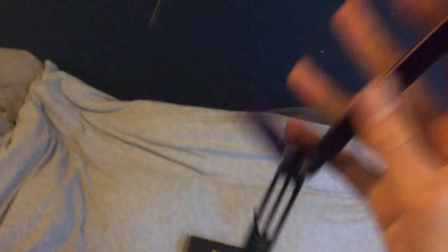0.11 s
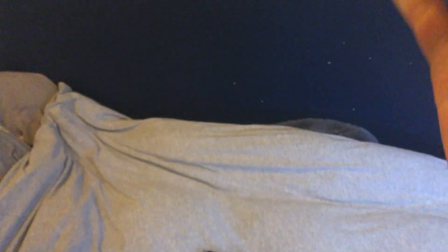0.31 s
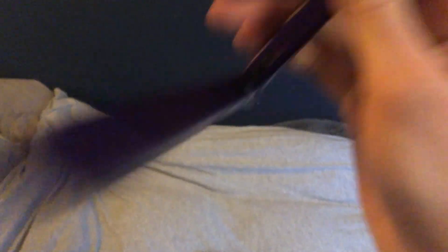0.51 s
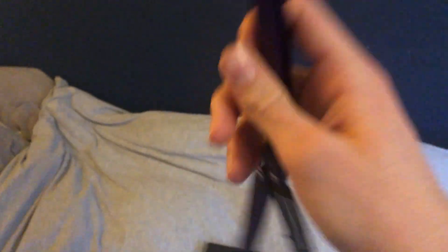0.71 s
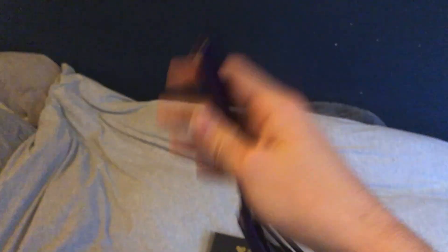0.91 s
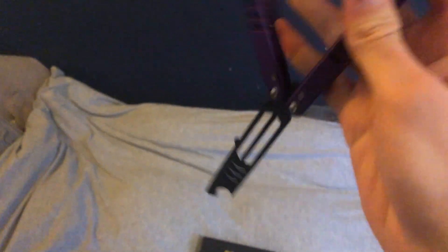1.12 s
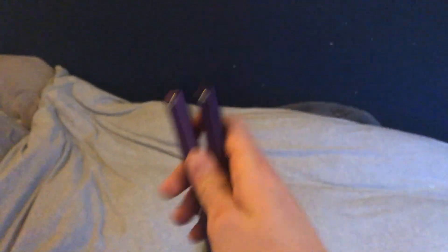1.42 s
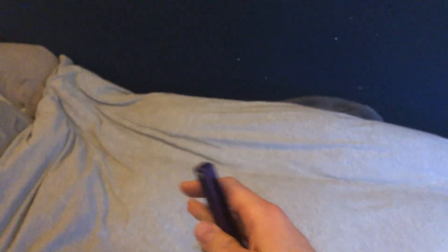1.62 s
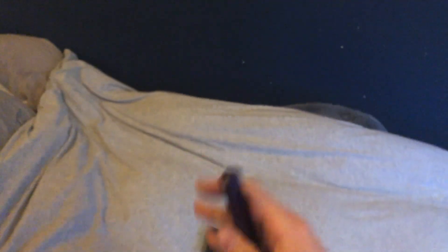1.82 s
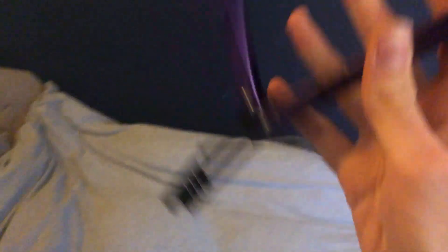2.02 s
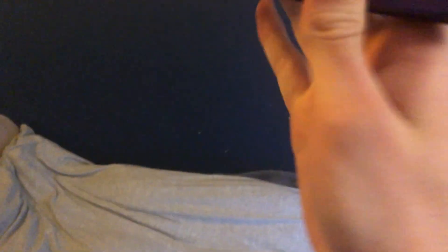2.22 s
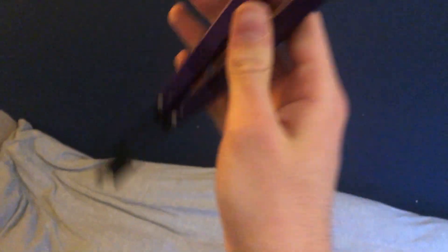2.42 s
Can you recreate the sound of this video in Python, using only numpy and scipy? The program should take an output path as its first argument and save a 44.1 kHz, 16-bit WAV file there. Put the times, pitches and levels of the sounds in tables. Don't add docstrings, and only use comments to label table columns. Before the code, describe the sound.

Metal handles of a folding knife trainer clack close to a phone in a small bedroom. A soft clap at 0.03 s, fast ringing chatter at 0.23-0.31, then faint ticks and brushes. A hard slap at 1.07, tight claps at 1.25, a snap at 1.75, a slap at 2.03, spaced clacks from 2.15 to 2.28, a weak clap at 2.37. High rings die quickly; short echo, faint blade singing, quiet hiss.

```python
import sys
import numpy as np
from scipy import signal
from scipy.fft import rfft, irfft
from scipy.io import wavfile
from scipy.ndimage import uniform_filter1d

SR = 44100
rng = np.random.default_rng(int(sys.argv[2]) if len(sys.argv) > 2 else 0)


def level_to_linear(level):
    exponent = np.asarray(level, float) / 20
    return 10 ** exponent


def pcm_store(signal):
    levels = np.round(np.clip(np.atleast_2d(signal), -1, 1) * 32767)
    wavfile.write(sys.argv[1], SR, levels.astype(np.int16).T)


N = 114660

# start_s, crack_db, main_ring_db, high_ring_db, free_s
CHATTER = [(.2330, -11, -10, -30, .010), (0.2539, -8, -3, -16.5, .006), (0.2714, -9, 1.5, -25.5, .0095),
           (0.2831, -5.5, -11, -22.5, .003), (0.2892, -42, -18.5, -28, .004), (0.297, -6, -8, -21.5, .002),
           (0.302, -28.5, -7.5, -18.5, 0.0099), (0.3122, -12, -12.5, -29.5, .006),
           (2.1480, -16.5, -16.5, -40.5, 0.0033), (2.1844, -2.5, -5, -9, 0.0052),
           (2.1993, -49, -20, -39, .008), (2.2159, -11, -6.5, -24, 0.0041), (2.2346, -8, -6, -14.5, 0.0052),
           (2.252, -8, -5, -19, .008), (2.2748, -10, -5, -28.5, 0.0015),
           (2.3340, -31.5, -27, -51.5, 0.0051)]
# start_s, crack_db, ring_db, free_s
CLAPS = [(0.0271, -23, -41, 0.0022), (0.028, -19, -14, .001), (1.0810, -27.5, -20, .002),
         (1.24, -35, -39.5, 0.0018), (1.2456, -6.5, -9.5, .003), (1.2545, -13.5, -17, 0.0041),
         (1.2605, -12, -7, 0.0017), (1.2627, -9.5, -1, 0.0014), (1.7290, -28.5, -33, 0.0049),
         (1.7443, -17, -23, 0.00078), (1.7457, -9.5, -7.5, .001), (2.367, -26, -20, 0.0012),
         (2.367, -17.5, -16.5, .001)]
# start_s, crack_db, ring_db, high_ring_db, free_s
SLAPS = [
    (1.0666, -8.5, -15, -44, .008),
    (1.0700, -20, -17, -56, .014),
    (1.2627, -30.5, -26, -44.5, .01),
    (1.7463, -27.5, -21.5, -35, .01),
    (2.027, -8, -7, -43, .012),
    (2.0285, -7.5, -16, -47, 0.0031),
    (2.0642, -36, -26.5, -48.5, .004),
]
OPPOSED = [.233, .2717, .3018, .3123]
# pitch_hz, level_db, t60_s (time to fade by 60 dB)
MAIN_TONES = [(2500, -29, .05), (2640, -29, .08), (2722, -19, .17), (2778, -21, .14), (2880, -31, .06),
              (5464, -28, .08), (7247, -3, .11), (7340, -1, .1), (7600, -20, .05), (6950, -18, .05)]
HIGH_TONES = [(12256, 0, .17), (12335, -6, .14), (12420, -10, .1), (14905, -20, .1), (11750, -20, .03),
              (12620, -12, .1)]
GRIPPED_TONES = [(2490, -25.5, 0.059), (2640, -29.5, .05), (4670, -19, 0.015), (5270, -16, 0.033),
                 (5940, -14.5, 0.027), (6650, -9.5, .06), (6866, -4.5, .05), (7200, -1.5, 0.15),
                 (7340, -3, 0.1), (7455, -7.5, 0.098), (7930, -10, 0.034), (8450, -14, 0.018),
                 (8790, -16, 0.013), (12300, -18, .06)]
LONE_TONES = [(2450, -26.5, .05), (2530, -26.5, .05), (2610, -30.5, .08), (3500, -30, 0.12),
              (5220, -25, 0.044), (5470, -27.5, 0.066), (5880, -18.5, .04), (7270, -2, 0.063),
              (7430, -14, .15), (7710, -15, .04), (8160, -22, .05), (11000, -25.5, .07), (12750, -27, .07),
              (15300, -33.5, .1)]
# pitch_hz, level_db
CRACK_COLOUR = [(100, -61.5), (1400, -26.5), (2600, -11.5), (3700, -17), (5200, -7), (7000, 0.5),
                (10000, -14.5), (15000, -17), (16500, -50.5)]
# pitch_hz, level_db
RATTLE_COLOUR = [(1000, 0), (7600, 0.5), (9600, -8.5), (12200, 5.5), (13600, -17.5), (15000, 1), (16500, 0)]
# start_s, level_db, t60_s
KNOCKS = [(.0284, -49, .02), (.233, -44, 0.023), (.272, -43, .02), (1.0681, -45.5, .02), (1.262, -35, .02),
          (1.746, -38.5, 0.018), (2.027, -36.5, 0.018), (2.148, -37.5, 0.017), (2.185, -36.5, .02),
          (2.2347, -36.5, 0.025), (2.2522, -35, 0.018), (2.2752, -29, 0.0168), (2.367, -45, 0.017)]
# pitch_hz, level_db
KNOCK_COLOUR = [(80, -18.5), (400, -0.5), (1100, 0.5), (2500, -10.5), (6000, -41.5)]
# start_s, level_db
GLANCES = [
    (.2332, -26),
    (1.2455, -31),
    (2.148, -29),
    (2.275, -35),
]
# start_s, low_tone_db, high_tone_db, free_s
SINGS = [
    (-.05, -64, -48, 0.09),
    (.028, -52.5, -44, 0.17),
    (0.33, -44.5, -45, 0.23),
    (1.067, -56.5, -53, 0.17),
    (1.27, -48, -46, 0.37),
    (1.746, -56, -31.5, 0.36),
    (2.027, -66, -29.5, 0.13),
    (2.275, -65, -49, 0.098),
    (2.38, -54, -59, .3),
]
# pitch_hz, level_db, t60_s
BLADE_TONES = [(5020, 0, 1.1), (5041, -7, .8), (6761, 0, .45), (6785, -9, .3)]
# start_s, level_db, pitch_hz, t60_s
LATCH = (1.263, -59, 1150, .6)
# start_s, level_db, pitch_hz, t60_s
TICKS = [(0.019, -45.5, 2280, .01), (.154, -51.5, 2250, 0.042), (.313, -38.5, 2036, 0.14),
         (.458, -52.5, 11900, 0.0051), (.484, -52.5, 6010, 0.014), (0.55, -57.5, 7000, 0.043),
         (.6, -53, 7060, 0.033), (.66, -51.5, 7200, 0.026), (.678, -47, 6500, 0.0088),
         (.695, -45, 6300, 0.018), (.745, -45.5, 11900, .004), (1.204, -46.5, 12200, .004),
         (1.216, -43, 12000, 0.0036), (1.24, -41.5, 13000, 0.0039), (1.515, -42, 4460, 0.0073),
         (1.573, -47, 2450, 0.01), (1.613, -50, 2370, 0.026), (1.671, -33.5, 2430, 0.011),
         (1.672, -31.5, 5160, 0.0084), (1.730, -28.5, 2310, 0.023), (1.931, -56.5, 11000, .004),
         (2.004, -48, 7400, .006), (2.596, -47, 2600, 0.015)]
# middle_s, length_s, level_db
BRUSHES = [
    (.46, .03, -60.5),
    (0.701, .04, -58),
    (0.956, 0.045, -68),
    (1.218, .04, -58),
    (1.499, .05, -68),
    (2.502, .1, -63),
]
# pitch_hz, level_db
BRUSH_COLOUR = [(1000, -27), (4000, -6), (7000, 1.5), (12000, -2.5), (16000, -4.5)]
# start_s, level_db, pitch_hz, t60_s
THUMPS = [
    (1.2135, -36, 67.8, 0.092),
]
# pitch_hz, t60_s
ROOM_FADE = [(300, 0.13), (2500, 0.3), (7000, 0.21), (9500, .12), (12200, 0.33), (13600, 0.064),
             (15000, 0.092)]
# pitch_hz, level_db (per Hz)
HUSH_COLOUR = [(20, -30.5), (50, -1), (90, -14), (140, -5.5), (300, -10), (700, -19.5), (1200, -26.5),
               (6500, -31), (15500, -39.5)]

CRACK_T60_S, GRIP_T60_S = 0.016, 0.028
LINGER_T60_S, LINGER_DB = 0.19, -27.5
MODE_SPREAD_DB, DETUNE = 3.0, 0.0022
FLUTTER_DB = 2.2
STIFLE_DB = -11.5
HALF_BEAT_S = 0.5 / (7340 - 7247)
SWELL_S = 0.082
ROOM_DB, ROOM_GAP_S = -12, 0.0029
HUSH_DB = -58.5
HUM_HZ, HUM_WIDTH_HZ, HUM_DB = 137, 6.1, -65.5


def evened(x):
    return x / np.sqrt(np.mean(x ** 2) + 1e-20)


def read(points, hz):
    f, value = np.transpose(points)
    return np.interp(np.log(hz + 1), np.log(f + 1), value)


def coloured(x, points):
    hz = np.fft.rfftfreq(len(x), 1 / SR)
    return irfft(rfft(x) * level_to_linear(read(points, hz)), len(x))


def add(mix, s, sound):
    at = round(s * SR)
    sound = sound[max(-at, 0):]
    part = mix[max(at, 0):][:len(sound)]
    part += sound[:len(part)]


def ring(modes, free_s, spread_db, seconds=.5, grip_t60=GRIP_T60_S, lead_s=0):
    t = np.arange(0, seconds, 1 / SR)
    hz, db, t60 = np.transpose(modes)[:, :, None]
    uneven, off_pitch = rng.standard_normal((2, len(modes), 1))
    size = level_to_linear(db + spread_db * uneven)
    pitch = hz * (1 + DETUNE * spread_db / 4 * off_pitch)
    waves = size * level_to_linear(-60 * t / t60) * np.sin(2 * np.pi * pitch * (t + lead_s))

    drift = rng.standard_normal(waves.shape)
    for _ in range(2):
        drift = uniform_filter1d(drift, size=len(t) // 25, axis=1)
    waves = waves * level_to_linear(FLUTTER_DB * evened(drift))

    held_s = np.maximum(t - free_s, 0)
    damping = level_to_linear(-60 * held_s / grip_t60) + level_to_linear(LINGER_DB - 60 * t / LINGER_T60_S)
    onset = np.minimum(t / 0.0004, 1)
    return waves.sum(0) / np.linalg.norm(size) * damping * onset


def crack(t60, points):
    t = np.arange(4096) / SR
    snap = evened(coloured(rng.standard_normal(4096), points))
    rattle = coloured(snap, RATTLE_COLOUR) * level_to_linear(-23.5 - 60 * t / (8 * t60))
    onset = np.minimum(t / 0.00014, 1)
    return (snap * level_to_linear(-60 * t / t60) + rattle) * onset


def chatter():
    out = np.zeros(N)
    following = CHATTER[1:] + [(N, 0)]
    for (s, crack_db, main_db, high_db, free_s), after in zip(CHATTER, following):
        lead_s = HALF_BEAT_S * np.isclose(s, OPPOSED, atol=.003).any()
        main = level_to_linear(main_db) * ring(MAIN_TONES, free_s, 1.7, .2, GRIP_T60_S, lead_s)
        high = level_to_linear(high_db) * ring(HIGH_TONES, .02, MODE_SPREAD_DB, .2, .08)
        rings = main + high
        since_next_s = np.arange(len(rings)) / SR + s - after[0]
        stifled = np.clip(since_next_s / .001, 0, 1) * (after[1] > -25)
        add(out, s, rings * level_to_linear(STIFLE_DB * stifled))
        add(out, s, level_to_linear(crack_db) * crack(CRACK_T60_S, CRACK_COLOUR))
    return out


def claps():
    out = np.zeros(N)
    for s, crack_db, ring_db, free_s in CLAPS:
        add(out, s, level_to_linear(crack_db) * crack(CRACK_T60_S, CRACK_COLOUR))
        add(out, s, level_to_linear(ring_db) * ring(GRIPPED_TONES, free_s, 2.8, .2, .012))
    return out


def slaps():
    out = np.zeros(N)
    for s, crack_db, ring_db, high_db, free_s in SLAPS:
        add(out, s, level_to_linear(crack_db) * crack(CRACK_T60_S, CRACK_COLOUR))
        add(out, s, level_to_linear(ring_db) * ring(LONE_TONES, free_s, 2.8, .2, 0.085))
        add(out, s, level_to_linear(high_db) * ring(HIGH_TONES, 0.026, 3.8, .2, .1))
    return out


def knocks():
    out = np.zeros(N)
    for s, db, t60 in KNOCKS:
        add(out, s, level_to_linear(db) * crack(t60, KNOCK_COLOUR))
    for s, db in GLANCES:
        add(out, s, level_to_linear(db) * ring(HIGH_TONES[3:4], 0.013, 0, 0.23))
    return out


def blade():
    out = np.zeros(N)
    for s, low_db, high_db, free_s in SINGS:
        low = ring(BLADE_TONES[:2], free_s, 0, .6, 0.26)
        high = ring(BLADE_TONES[2:], free_s, 0, .6, .06)
        swell = np.minimum(np.arange(len(low)) / SR / SWELL_S, 1) ** 2
        add(out, s, level_to_linear(low_db) * swell * low + level_to_linear(high_db) * high)
    return out


def latch():
    out = np.zeros(N)
    s, db, hz, t60 = LATCH
    add(out, s, level_to_linear(db) * ring([(hz, 0, t60)], 1, 0, 0.27))
    return out


def pins():
    out = np.zeros(N)
    for s, db, hz, t60 in TICKS:
        colour = [(hz / 9, -50), (hz / 2, -16), (hz, 0), (hz * 2, -7), (hz * 4, -30)]
        add(out, s, level_to_linear(db - 6) * crack(0.014, colour))
        add(out, s, level_to_linear(db) * ring([(hz, -3, t60)], 1, 0, 0.18))
    return out


def fingers():
    grains = rng.standard_normal(N) * level_to_linear(2 * rng.exponential(1, N))
    hiss = evened(coloured(grains, BRUSH_COLOUR))
    t = np.arange(N) / SR
    strokes = sum(level_to_linear(db) * np.exp(-(2 * (t - s) / length) ** 2) for s, length, db in BRUSHES)
    return hiss * strokes


def palm():
    out = np.zeros(N)
    t = np.arange(4000) / SR
    for s, db, hz, t60 in THUMPS:
        turns = np.cumsum(hz * (1 + 4 * np.exp(-t / 0.0028))) / SR
        add(out, s, level_to_linear(db - 60 * t / t60) * np.sin(2 * np.pi * turns))
    return out


def room(x):
    length = SR // 2
    taps = np.zeros((2, length))
    at = np.arange(0, length - 20, 20) + rng.integers(0, 20, (2, (length - 1) // 20))
    np.put_along_axis(taps, at, rng.choice([-1., 1.], at.shape), 1)
    taps *= np.clip(np.arange(length) / SR / ROOM_GAP_S - 1, 0, 1)

    hz, t, z = signal.stft(taps, SR, nperseg=128)
    fade = level_to_linear(-60 * t / read(ROOM_FADE, hz)[:, None])
    tail = signal.istft(z * fade, SR, nperseg=128)[1]

    turn = 2 * np.pi * 11 * np.arange(N) / SR
    feeds = x * np.array([np.sin(turn), np.cos(turn)])
    return signal.fftconvolve(feeds, tail / np.linalg.norm(tail[0]), axes=1)[:, :N].sum(0)


def hush():
    hiss = evened(coloured(rng.standard_normal(N), HUSH_COLOUR))
    hz = np.fft.rfftfreq(N, 1 / SR)
    narrow = 1 / (1 + ((hz - HUM_HZ) / HUM_WIDTH_HZ) ** 2)
    hum = evened(irfft(rfft(rng.standard_normal(N)) * narrow, N))
    return level_to_linear(HUSH_DB) * hiss + level_to_linear(HUM_DB) * hum


def scene():
    handles = chatter() + claps() + slaps()
    near = handles + knocks() + pins() + fingers() + palm()
    singing = blade() + latch()
    return (near + singing + level_to_linear(ROOM_DB) * room(near) + hush())[None]


def top_cut(x):
    return signal.sosfilt(signal.butter(12, 15650, fs=SR, output="sos"), x)


def record(dry):
    ceiling = .99
    return top_cut(np.clip(dry, -ceiling, ceiling))


dry = scene()
out = record(dry)
pcm_store(out)
```